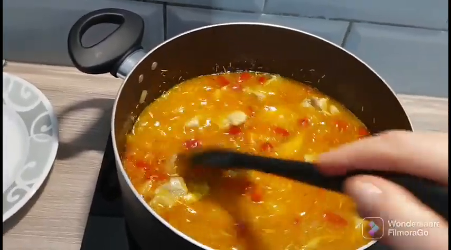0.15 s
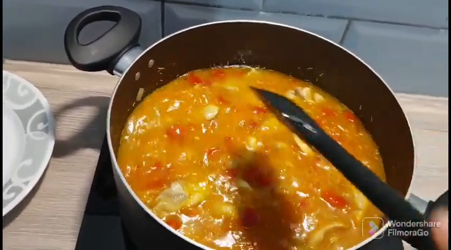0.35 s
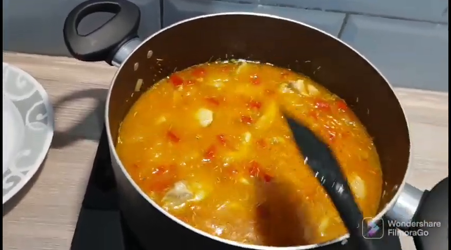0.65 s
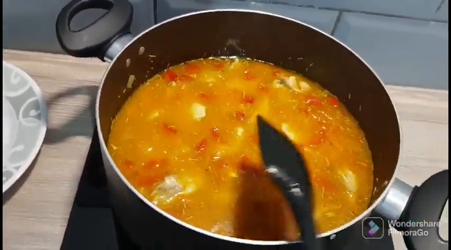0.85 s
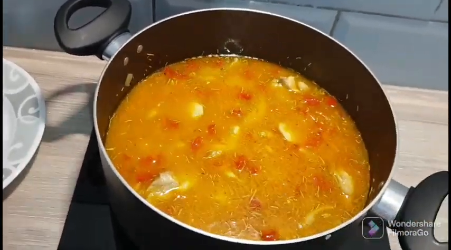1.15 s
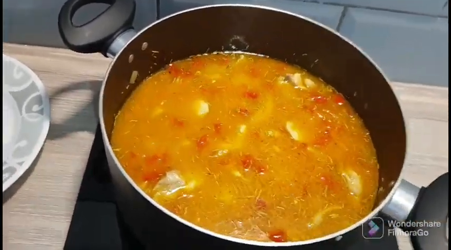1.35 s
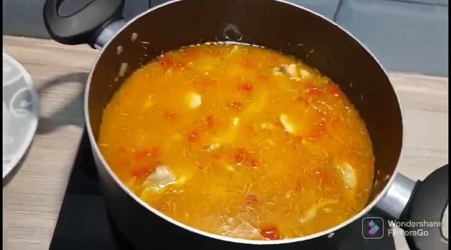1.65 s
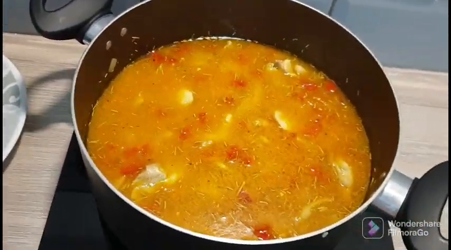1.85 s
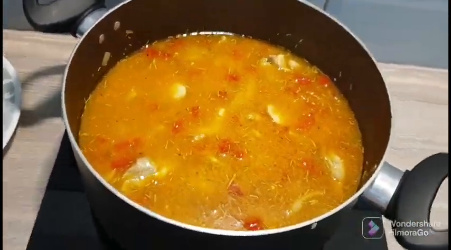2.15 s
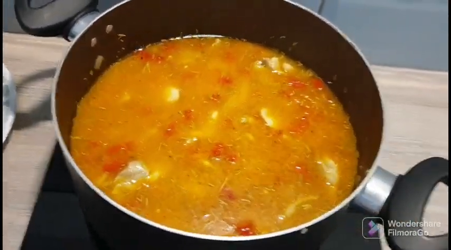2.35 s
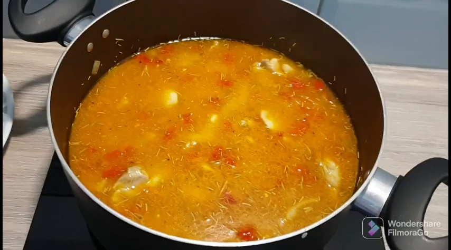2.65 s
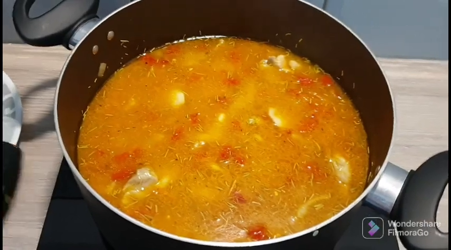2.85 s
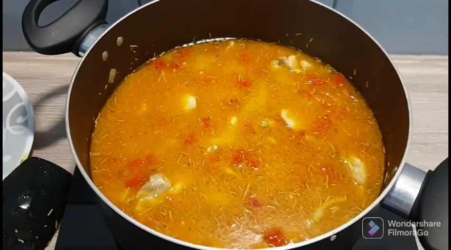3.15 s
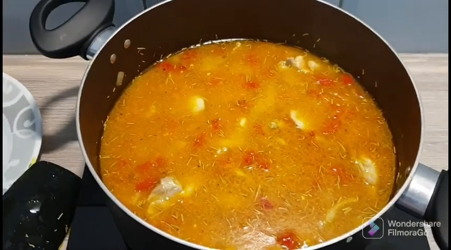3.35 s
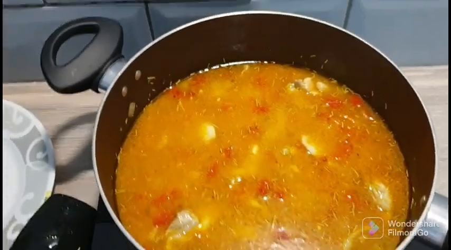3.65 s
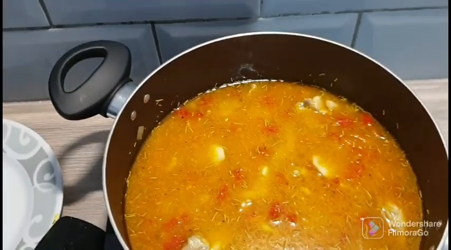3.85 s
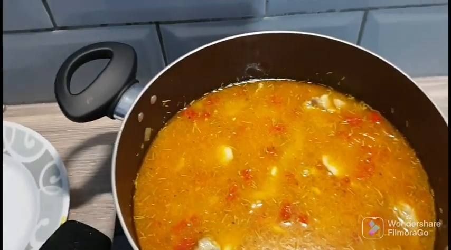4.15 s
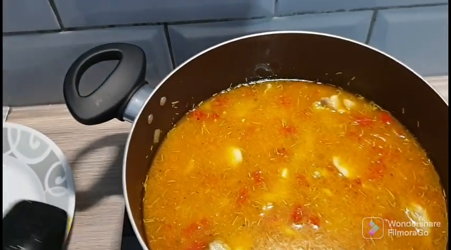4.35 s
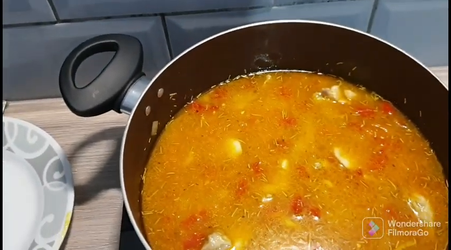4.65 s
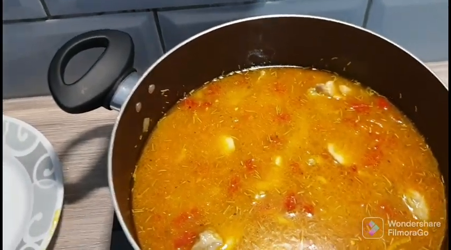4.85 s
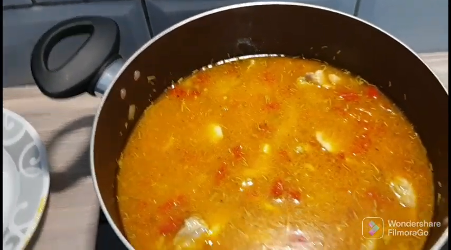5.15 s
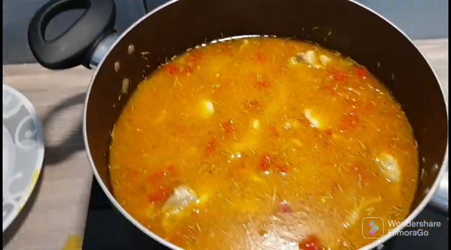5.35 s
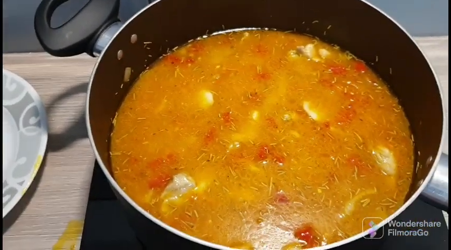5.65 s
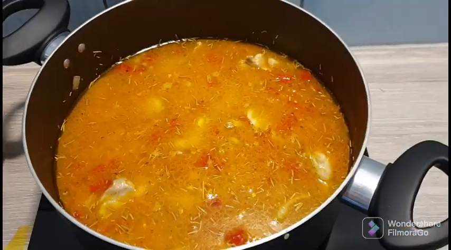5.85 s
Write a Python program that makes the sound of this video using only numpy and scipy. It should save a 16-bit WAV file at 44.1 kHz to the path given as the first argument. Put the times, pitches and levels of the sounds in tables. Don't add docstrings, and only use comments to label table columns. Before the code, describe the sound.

Dull spoon taps on a pot rim thump the worktop, then sharp ringing clatter on a plate and a loud hard double clank.

```python
import sys
import numpy as np
from scipy import signal
from scipy.fft import rfft, irfft
from scipy.io import wavfile
from scipy.ndimage import uniform_filter1d, map_coordinates

SR = 44100
rng = np.random.default_rng(int(sys.argv[2]) if len(sys.argv) > 2 else 0)


def ratio_of_db(decibels):
    return 10 ** (np.asarray(decibels, float) / 20)


def digitize_waveform(pressure):
    field = np.atleast_2d(pressure).T
    bounded = np.clip(field, -1, 1)
    quanta = np.round(bounded * 32767).astype(np.int16)
    wavfile.write(sys.argv[1], SR, quanta)


N = 265014
SPAN = 20000


def unit(x):
    return x / np.sqrt(np.mean(x ** 2) + 1e-20)


def along(points, hz):
    f, v = np.transpose(points)
    return np.interp(np.log(hz + 1), np.log(f + 1), v)


def peak(f, centre_hz, width_hz):
    return 1j * f * width_hz / (centre_hz ** 2 - f * f + 1j * f * width_hz + 1e-9)


def add(out, s, sound):
    out[:, round(s * SR):][:, :sound.shape[1]] += sound


def ports_apart(f):
    return np.clip(f / 650, 0, 1) ** 3


# frequency in Hz, t60 in s.
TILES = [(150, 0.5), (600, 0.22), (2000, 0.24), (5000, 0.19), (12000, 0.17)]


def tail():
    hz, t, z = signal.stft(rng.standard_normal((2, SPAN - 4000)), SR, nperseg=256)
    decay = ratio_of_db(-60 * t / along(TILES, hz)[:, None])
    x = signal.istft(z * decay, SR, nperseg=256)[1]
    delayed = np.pad(x / np.linalg.norm(x[0]), ((0, 0), (260, 0)))
    mid, side = rfft(delayed, SPAN)
    apart = ports_apart(np.fft.rfftfreq(SPAN, 1 / SR))
    return np.array([mid + apart * side, mid - apart * side]) / np.sqrt(1 + apart ** 2)


def in_room(sound, wet_db):
    return irfft(rfft(sound, SPAN) * (1 + ratio_of_db(wet_db) * tail()), SPAN)


# start in s, body in dB, weight (low knock) and hardness (clack) in dB re body.
KNOCKS = [(1.574, -43.5, 12.5, -24), (1.58, -30.5, -12, 0), (1.586, -30, -21, -9),
          (1.728, -37, 10.5, -12.5), (1.737, -28.5, -4, -13.5), (1.744, -34.5, 6.5, -7),
          (2.056, -36.5, 16.5, 6.5), (2.06, -20, -6, -7.5), (2.072, -19.5, -23, -10.5),
          (2.132, -28.5, -8, -34), (2.138, -23.5, -1.5, -5.5), (2.256, -51.5, 12.5, -6),
          (2.315, -38, 8.5, -3.5), (2.322, -26, -4, -11.5), (2.345, -37.5, 6, -17), (2.369, -37, 2, -9),
          (2.389, -35.5, 0, -12), (2.412, -39, -1, -10), (2.439, -48.5, 16.5, -31), (2.486, -36.5, 7, -9),
          (2.526, -30.5, 1.5, -9), (2.533, -32, 2.5, -21.5), (2.585, -54, 14, -34), (3.059, -62, 4, -7),
          (3.078, -32.5, 4.5, -15), (3.091, -31.5, -7, -14), (3.123, -26.5, 2, -9.5),
          (3.133, -31, -14, -28)]
# frequency in Hz, width in Hz, level in dB.
CROCKERY = [(409, 57, -41), (1009, 90, 7.5), (1308, 30, -0.5), (1550, 96, -3.5), (2446, 88, 4),
            (2790, 230, -4), (2990, 140, -20), (3840, 160, -9.5), (4240, 90, -18), (4590, 35, -10),
            (4745, 120, -9), (5760, 71, -2.5), (6490, 60, -16), (7340, 82, -15), (9100, 52, 4),
            (8480, 170, -9.5), (3330, 46, -50.5), (11700, 95, -17), (5050, 100, -24), (14600, 80, -18)]


def spoon_on_plate():
    return contacts(KNOCKS, CROCKERY, click=0.79, chatter_t60=0.047, rise=0.0011, fill_db=-13,
                    wet_db=-7.5, edge_db=-20.5, pan_db=2.0)


# start in s, body in dB, weight and hardness in dB re body.
CLANKS = [
    (4.715, -44.5, 13.5, -10),
    (4.72, -36.5, 4.5, -5.5),
    (4.734, -16, -7.5, 0.5),
    (4.737, -14.5, -18.5, -8.5),
    (4.741, -20, 3.5, -17),
    (4.821, -22, -6.5, 6),
    (4.8235, -16, -6, 3.5),
    (4.828, -20, -3, -21.5),
]
# frequency in Hz, width in Hz, level in dB.
JAR = [(478, 45, -14), (851, 60, -8), (1005, 50, 6), (1309, 40, 4), (1552, 45, -4), (2425, 100, 0),
       (2595, 60, -12), (3810, 90, -6), (4605, 80, 0), (4785, 90, 2), (5500, 150, -10), (6495, 70, -8),
       (8970, 150, -8), (11610, 90, -4)]


def jar_put_down():
    return contacts(CLANKS, JAR, click=1.3, chatter_t60=0.043, rise=0.001, fill_db=-11.5,
                    wet_db=-8.5, edge_db=-13.5, pan_db=3.5)


# start in s, body in dB, weight and hardness in dB re body.
PADDED = [
    (.691, -37.5, 15, -28.5),
    (.697, -46, 15, -19),
    (.704, -46.5, 3.5, -8),
    (.72, -38.5, 0.5, -13.5),
    (.871, -49.5, 21, -22),
    (.885, -47, 12.5, -21),
    (.903, -61, 1, -23.5),
    (3.043, -74, 35.5, 4.5),
]
# frequency in Hz, width in Hz, level in dB.
CUPBOARD = [(264, 30, 8), (477, 84, -7), (722, 380, -20), (1000, 140, 6.5), (1430, 500, -16.5),
            (3670, 1300, -5.5)]


def spoon_on_rim():
    return contacts(PADDED, CUPBOARD, click=0.12, chatter_t60=0.15, rise=0.00265, fill_db=-23.0,
                    wet_db=-11.5, edge_db=-49.5, pan_db=2.0)


# start in s, body in dB, weight and hardness in dB re body.
TAPS = [(1.495, -68, 8, -12), (2.92, -70, 7, -35.5), (3.836, -51.5, -3, -28), (3.929, -66.5, -1, -6),
        (4.221, -75, -23, 6), (4.342, -49, -16.5, -2.5), (4.351, -46.5, -18, -8.5), (4.478, -52, -8, -35),
        (4.497, -48, -6, -35), (4.568, -45.5, -5.5, -40), (4.623, -62, -18, -23), (5.161, -50, 2, -25),
        (5.283, -66, 3.5, -10), (5.878, -49, -13.5, -47.5), (5.981, -55, -8, -26)]
# frequency in Hz, width in Hz, level in dB.
DOOR = [(644, 78, 5.5), (785, 380, 0), (890, 210, -9), (4844, 2900, -15.5)]


def cupboard_taps():
    return contacts(TAPS, DOOR, click=0.77, chatter_t60=0.028, rise=.0005, fill_db=-22.5,
                    wet_db=-2.5, edge_db=-17, pan_db=1.0)


BANDS = [(280, 650), (700, 1800), (2000, 5500), (7000, 15000)]
# frequency in Hz, width in Hz, lift in dB.
PORT = [(6340, 160, 1.5), (7210, 170, 5.5), (8080, 900, -12), (8930, 390, 3), (9740, 200, 3.5),
        (10240, 400, -11), (11000, 200, 3), (11160, 240, -7.5), (11800, 450, 9.5), (12500, 580, 4),
        (13500, 600, -10), (14500, 400, 9), (15110, 300, -8), (15600, 250, 10.5)]


def contacts(table, body_modes, click, chatter_t60, rise, fill_db, wet_db, edge_db, pan_db):
    dull_hz, right_late_s, chatter_apart = 7006, 0.00019, 0.74
    edge_follows = 0.47
    early = 64
    out, f, t = np.zeros((2, N + SPAN)), np.fft.rfftfreq(SPAN, 1 / SR), np.arange(4000) / SR
    apart = ports_apart(f)
    port = np.prod([1 + (ratio_of_db(lift_db) - 1) * peak(f, hz, width) for hz, width, lift_db in PORT], axis=0)
    for s, db, low_db, clack_db in table:
        swell = ratio_of_db(-60 * t / chatter_t60) * (1 - np.exp(-t / rise))
        chatter = rng.standard_normal((2, len(t))) * swell
        mid, side = rfft(chatter, SPAN) / (1 + 1j * f / dull_hz)
        side = chatter_apart * apart * side
        first_click = click * np.exp(-2j * np.pi * np.outer([0, right_late_s], f * apart))
        blow = first_click + 0.18 * np.array([mid + side, mid - side])

        shared_db = rng.normal(0, 1.6, len(body_modes))
        strength_db = shared_db + rng.normal(0, 1.6, (2, len(body_modes)))
        modes = np.zeros((2, len(f)), complex)
        for k, (hz, width, level) in enumerate(body_modes):
            strength = ratio_of_db(0.34 * level + strength_db[:, k, None])
            modes += (-1) ** k * strength * peak(f, hz, 1.1 * width)
        body = blow * (modes + ratio_of_db(fill_db)) * (1 + ratio_of_db(wet_db) * tail())

        have = [np.sqrt(np.sum(np.abs(body[:, (f > lo) & (f < hi)]) ** 2)) for lo, hi in BANDS]
        asked_db = np.array([low_db, 0, clack_db, edge_db + edge_follows * clack_db]) + db
        low, middle, clack, edge = asked_db + 64.5 - 20 * np.log10(have)
        colour = along([(170, low - 16), (300, low - 6), (450, low + 1.1), (1100, middle),
                        (3300, clack), (11500, edge), (16000, edge - 16)], f)
        pan = np.outer([.5, -.5], pan_db * apart)
        late = np.exp(-2j * np.pi * f * early / SR)
        sound = irfft(body * port * ratio_of_db(colour + pan) * late, SPAN)
        add(out, s - early / SR, sound[:, :SPAN - 2000])
    return out[:, :N]


# start in s, mode in Hz, peak in dB, t60 in s.
RINGS = [(1.582, 2620, -41, 0.12), (1.582, 1503, -53, 0.27), (1.734, 4820, -57, 0.16),
         (1.733, 2374, -46, 0.16), (2.06, 401.7, -41, 0.47), (2.055, 379.5, -32, 0.085),
         (2.059, 587, -32, 0.15), (2.14, 600, -38, .07), (2.141, 1435, -62, .6),
         (2.531, 2450, -37.5, 0.068), (2.534, 1300, -56, 0.29), (3.123, 1435, -54.5, 0.51),
         (3.122, 2520, -44, 0.17), (3.122, 3830, -58, 0.14), (3.13, 3760, -62.5, .25),
         (4.342, 6800, -64, .06), (4.341, 4930, -48, 0.019), (4.83, 1260, -52.5, 0.68),
         (4.824, 2464, -40.5, 0.076), (4.737, 1200, -28, 0.12), (4.736, 2396, -28.5, 0.16),
         (4.823, 1557, -32.5, 0.084), (4.823, 3900, -32, 0.094), (4.823, 1316, -35, .18),
         (4.737, 4510, -36, 0.048),
         (1.583, 1005, -40, 0.092), (1.583, 3220, -48, .06), (1.583, 4820, -55, 0.17),
         (1.735, 974, -46, 0.089), (1.733, 1290, -42.5, .1), (1.736, 4200, -57, 0.15),
         (2.056, 2890, -37, .04), (2.062, 2485, -42, .12), (2.066, 1007, -27.5, 0.11),
         (2.064, 1550, -35, .1), (2.057, 4100, -42, .09), (2.066, 4500, -45, 0.11), (2.138, 1005, -32, .1),
         (2.138, 2445, -36.5, 0.08), (2.139, 1324, -42, .09), (2.138, 4820, -49, .08),
         (2.136, 5780, -52, 0.078), (2.138, 6580, -53, 0.072), (2.321, 1000, -37, 0.072),
         (2.321, 2476, -46, 0.091), (2.323, 4160, -50, .04), (2.368, 2470, -49, .08),
         (2.412, 2484, -48.5, 0.087), (2.486, 2476, -46, .08), (2.487, 500, -49, .08),
         (2.53, 1004, -37.5, 0.068), (2.53, 4890, -51.5, 0.048), (3.079, 530, -45, .08),
         (3.123, 525, -37, 0.083), (3.123, 1060, -44, 0.078), (4.342, 7600, -65, .05),
         (4.342, 8600, -67, .05), (4.342, 9750, -69, 0.047), (4.737, 957, -32, .1),
         (4.745, 7170, -53, 0.18), (4.824, 1008, -31, 0.12), (4.824, 2557, -35, 0.12),
         (4.824, 3806, -41.5, 0.21), (4.823, 4820, -34, 0.086), (4.823, 5766, -39, 0.065),
         (4.823, 7180, -40.5, 0.13), (4.824, 6560, -46, .13)]
# start in s, mode in Hz, peak in dB, t60 in s.
LINGERS = [(1.734, 1436, -59, .6), (1.734, 414.5, -49, .6), (2.139, 2960, -60, .5), (2.14, 4880, -61, .35),
           (2.14, 3830, -62, .35), (1.584, 3806, -62, .4)]


def plate():
    return ringing(RINGS + LINGERS)


# start in s, mode in Hz, peak in dB, t60 in s.
LID = [
    (4.341, 3800, -70, .45),
    (4.341, 2934, -72, .4),
    (4.341, 1480, -66, .3),
    (4.345, 1330, -58, .15),
]


def lid():
    return ringing(LID)


# start in s, pitch in Hz, peak in dB,
# t60 in s.
DRIP = [
    (.209, 1805, -57, .04),
    (.221, 1760, -62, .04),
    (.232, 1810, -70, .06),
]


def drip():
    return ringing(DRIP)


def ringing(table):
    ring_db, left_lean_db = 6.5, 4.5
    out, t = np.zeros((2, N + SPAN)), np.arange(SPAN - 4000) / SR
    for s, hz, db, t60 in table:
        port_phase = rng.uniform(-1, 1, (2, 1)) * min(hz / 900, 1) ** 2
        phase = port_phase + .055 * np.cumsum(rng.standard_normal(len(t)))
        envelope = ratio_of_db(db - 60 * t / t60) * (1 - np.exp(-t / 0.0016))
        ring = envelope * np.sin(2 * np.pi * hz * t + phase)
        heard = in_room(ring, wet_db=-9.0)
        heard *= np.linalg.norm(ring, axis=1, keepdims=True) / np.linalg.norm(heard, axis=1, keepdims=True)
        lean = left_lean_db * min(hz / 2400, 1) ** 2 * np.array([[.5], [-.5]])
        add(out, s, heard * ratio_of_db(ring_db + lean))
    return out[:, :N]


# start in s, peak in dB, pitch in Hz, t60 in s.
POT_THUMPS = [
    (.687, -16.5, 109.7, 0.15),
    (.706, -13, 137.2, 0.097),
    (.741, -22, 132, 0.13),
    (.799, -44, 111, 0.092),
    (.865, -16.5, 118.4, 0.07),
    (.883, -25, 134.6, 0.19),
    (.919, -27.5, 134.4, 0.12),
    (.999, -25, 119.5, 0.012),
]
# start in s, peak in dB, pitch in Hz, t60 in s.
PLATE_THUMPS = [(1.572, -21.5, 155.4, 0.11), (1.629, -48.5, 119.5, 0.27), (1.734, -29, 161, 0.11),
                (1.789, -65, 168, 0.15), (2.056, -26, 165.4, 0.1), (2.139, -28.5, 152, 0.087),
                (2.254, -31, 155, 0.118), (2.284, -24, 156, 0.051), (2.327, -30.5, 154, 0.094),
                (2.376, -40, 169.4, 0.23), (2.444, -31.5, 151.7, 0.15), (2.488, -27, 144, 0.086),
                (2.538, -36.5, 170.4, 0.18), (2.569, -34.5, 147, 0.096), (3.041, -36.5, 108, 0.09),
                (3.07, -35.5, 168.3, 0.23), (3.123, -27, 156.7, 0.095), (3.147, -29.5, 156, 0.071),
                (4.711, -15, 148, 0.1), (4.74, -19, 147, 0.091), (4.8, -18, 159.6, 0.11),
                (4.822, -19.5, 156, 0.11), (4.859, -33.5, 169, 0.15), (4.909, -39, 171, 0.1),
                (4.967, -32.5, 158, 0.095)]
# start in s, peak in dB, pitch in Hz.
NUDGES = [(3.842, -41.5, 137.5), (3.923, -40.5, 137.5), (4.139, -48, 150), (4.223, -47.5, 175),
          (4.289, -47, 135), (4.343, -43, 163), (4.492, -39, 136), (4.578, -41.5, 141), (5.008, -55, 145.4),
          (5.14, -51, 166.3)]


def thumps():
    panels, booms, t = np.zeros((2, N + SR)), np.zeros((2, N + SR)), np.arange(SR // 2) / SR
    cavity = np.sin(2 * np.pi * 41 * t) + 0.6 * np.sin(2 * np.pi * 70 * t)
    boom = cavity * ratio_of_db(-60 * t / .5) * (1 - np.exp(-t / 0.0035))
    nudges = [(*row, 0.1) for row in NUDGES]
    for table, sub_db, rise in [(POT_THUMPS, -12, .008), (PLATE_THUMPS, -22, .011), (nudges, -13, .009)]:
        for s, db, hz, t60 in table:
            swell = 1 - np.exp(-(t / rise) ** 2)
            panel = np.sin(2 * np.pi * hz * t) * ratio_of_db(-60 * t / t60) * swell
            add(panels, s, ratio_of_db(db + 9.0) * panel[None])
            add(booms, s, ratio_of_db(db + sub_db + 4.0) * boom[None])
    room = signal.fftconvolve(panels, irfft(tail(), SPAN), axes=1)[:, :N]
    return (panels + booms)[:, :N] * ratio_of_db([[-.6], [.6]]) + ratio_of_db(-18.0) * room


def filtered(x, hz, width):
    return irfft(rfft(x, SPAN) * peak(np.fft.rfftfreq(SPAN, 1 / SR), hz, width) ** 2, SPAN)


TICK_AT = [.077, .141, .848, 1.425]
# peak in dB, pitch in Hz, width in Hz, t60 in s.
TICKS = [
    (-47.5, 5900, 10300, 0.24),
    (-54, 3900, 4500, 0.15),
    (-59.5, 12000, 5840, .05),
    (-64.5, 4700, 510, .03),
]


def ticks():
    out, t = np.zeros((2, N + SPAN)), np.arange(SR // 4) / SR
    for s, (db, hz, width, t60) in zip(TICK_AT, TICKS):
        click_and_spray = ratio_of_db(-60 * t / 0.0062) + 0.48 * ratio_of_db(-60 * t / t60)
        tick = filtered(rng.standard_normal((2, len(t))) * click_and_spray, hz, width)
        add(out, s, ratio_of_db(db) * tick / np.abs(tick).max())
    return out[:, :N]


# start in s, length in s, centre in Hz, width in Hz.
SLIDE_AT = [(1.482, .07, 6000, 7000), (1.47, .1, 4900, 500), (2.88, .24, 3800, 150), (2.88, .22, 1650, 500),
            (5.24, .12, 4200, 1700), (5.22, .14, 6220, 670), (5.11, .06, 9600, 6900),
            (1.93, .16, 5200, 3100), (2.33, .25, 4300, 3500), (1.47, .1, 2500, 400), (3.14, .2, 3800, 200),
            (2.16, .15, 5000, 3500), (1.48, .07, 500, 400)]
SLIDES = [-64, -61, -59, -63.5, -64, -65, -74, -73, -77, -55.5, -65, -66, -62]


def slides():
    out, t = np.zeros((2, N + SPAN)), np.arange(SR // 4) / SR
    for (s, length, hz, width), db in zip(SLIDE_AT, SLIDES):
        swell = np.sin(np.pi * np.clip(t / length, 0, 1)) ** 0.71
        grain = rng.standard_normal((2, len(t))) * ratio_of_db(3.9 * rng.standard_normal(len(t)))
        add(out, s, ratio_of_db(db) * in_room(filtered(unit(grain) * swell, hz, width), wet_db=-3.5))
    return out[:, :N]


def wobble(rate):
    return map_coordinates(rng.standard_normal(int(N * rate / SR) + 4), [np.arange(N) * rate / SR])


# frequency in Hz, left-right likeness from -1 to 1.
ALIKE = [(60, 0.95), (150, 0.87), (380, 0.56), (950, 0.32), (2380, 0.01), (5980, -0.46), (15000, -0.26)]


def rush(spectrum, patchy_db):
    z = signal.stft(rng.standard_normal((2, N)), nperseg=512)[2]
    field = uniform_filter1d(rng.standard_normal(z.shape[1:]), size=5, axis=0)
    field = uniform_filter1d(field, size=10, axis=1)
    pair = signal.istft(z * ratio_of_db(patchy_db * unit(field)), nperseg=512)[1][:, :N]
    hz = np.fft.rfftfreq(N, 1 / SR)
    turn = np.arccos(np.clip(along(ALIKE, hz), -1, 1)) / 2
    shape = ratio_of_db(along(spectrum, hz)) * (hz < 15850)
    mid, side = irfft(rfft(pair) * shape * [np.cos(turn), np.sin(turn)], N)
    return unit(np.array([mid + side, mid - side]))


# time in s, level in dB.
BUSTLE = [(0, -77.5), (.37, -84), (.7, -81.5), (.85, -70.5), (1.1, -81.5), (1.36, -86.5), (1.55, -67),
          (1.9, -75.5), (2.1, -57.5), (2.26, -54.5), (2.46, -48), (2.61, -57.5), (2.69, -81), (3.15, -56.5),
          (3.5, -72), (4.5, -63.5), (5.4, -65), (6.01, -68.5)]
# frequency in Hz, density in dB per Hz.
SIMMER = [(140, -34), (230, -2), (871, -7.5), (950, -11), (1410, -20), (2190, -26), (2540, -21),
          (3020, -32), (3550, -27), (4500, -27.5), (5850, -59), (9900, -120)]
STEAM = [(5000, -27), (7500, -8), (9300, -4.5), (11000, -9.5), (14000, -31.5)]


def bustle_and_steam(t, bustle_db):
    steam_db = np.interp(t, [2.76, 2.76 + 0.3, 4.6, N / SR], [-101, -90, -82, -87.5])
    airy = ratio_of_db(steam_db) + ratio_of_db(bustle_db - 31)
    steam = rush(STEAM, patchy_db=.6)
    return ratio_of_db(bustle_db + 1.6 * wobble(3.9)) * rush(SIMMER, patchy_db=0) + airy * steam


# frequency in Hz, density in dB per Hz.
RUMBLE = [(8.8, -40), (26, -17), (43, 3.5), (68, -2.5), (84, -15), (92, -16.5), (100, -11), (130, -45),
          (220, -120)]
HUM = [(53, -49.5), (90, -10), (123, -1.5), (145, 2.5), (171, 0.5), (194, -30.5), (260, -19.5), (340, -43),
       (570, -120)]


def rumble_and_hum(t, bustle_db):
    rock_s, rock_rise_s, rock_fall_s = 0.88, 0.085, 0.13
    rock = np.exp(-((t - rock_s) / np.where(t < rock_s, rock_rise_s, rock_fall_s)) ** 2)
    rumble = ratio_of_db(-51 - 0.88 * t) + ratio_of_db(-32) * rock
    calm_db, hum_follows = -69.5, 0.62
    hum = ratio_of_db(-60.5 + hum_follows * (bustle_db - calm_db)) + ratio_of_db(-44) * rock
    low = rumble * ratio_of_db(2.5 * wobble(6)) * rush(RUMBLE, patchy_db=0.5)
    return low + hum * ratio_of_db(4.8 * wobble(9.8)) * rush(HUM, patchy_db=-3.0)


# frequency in Hz, density in dB per Hz.
HISS = [(120, -36), (200, 5), (334, 0), (621, -11), (946, -6.5), (1120, -14.5), (1220, -7.5), (1470, -9.5),
        (4390, -13.5), (5200, -14.5), (7330, -21), (11600, -16), (15800, -14)]


def hiss():
    return ratio_of_db(-80.5 + 4.5) * rush(HISS + [(16500, -120)], patchy_db=0.0)


def kitchen_air():
    t = np.arange(N) / SR
    bustle_db = np.interp(t, *np.transpose(BUSTLE))
    return bustle_and_steam(t, bustle_db) + rumble_and_hum(t, bustle_db) + hiss()


def scene():
    knocks = spoon_on_plate() + jar_put_down() + spoon_on_rim() + cupboard_taps()
    rings = plate() + lid() + drip()
    return knocks + rings + thumps() + ticks() + slides() + kitchen_air()


def roll_off(x):
    return signal.sosfilt(signal.butter(12, 16820, fs=SR, output="sos"), x)


def record(dry):
    low_cut_hz, top_hz = 22, 16500
    f = np.fft.rfftfreq(N, 1 / SR)
    edge = (1j * f / (low_cut_hz + 1j * f)) ** 2 / (1 + (f / top_hz) ** 120)
    mix = irfft(rfft(dry) * edge, N)
    return roll_off(mix)


dry = scene()
out = record(dry)
digitize_waveform(out)
```